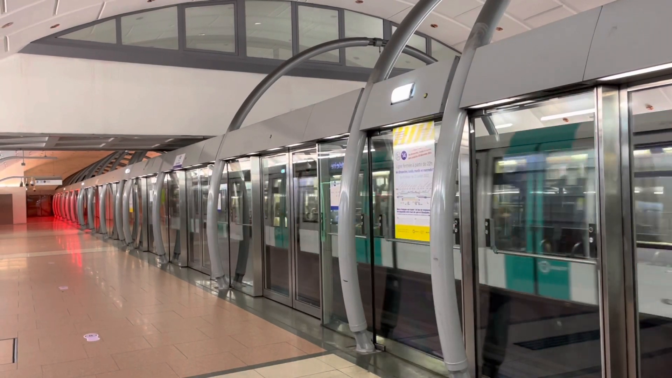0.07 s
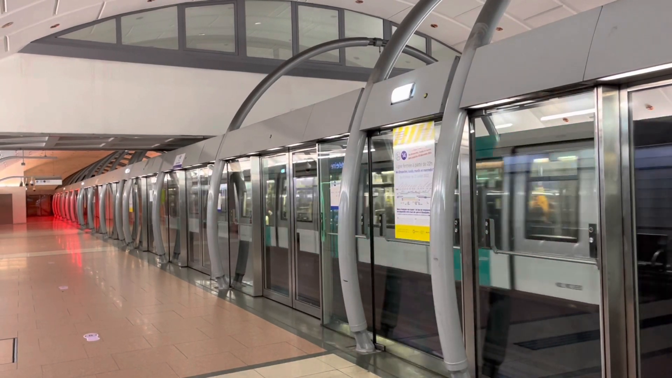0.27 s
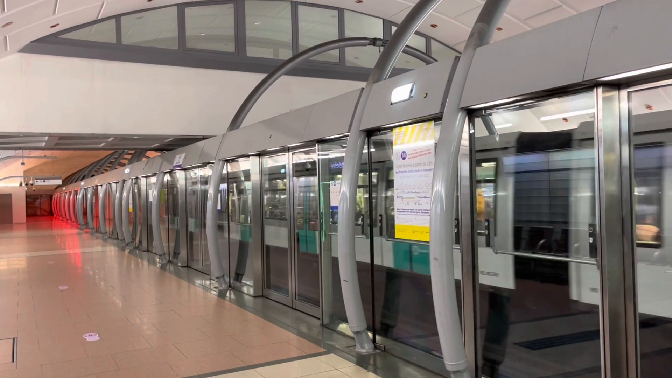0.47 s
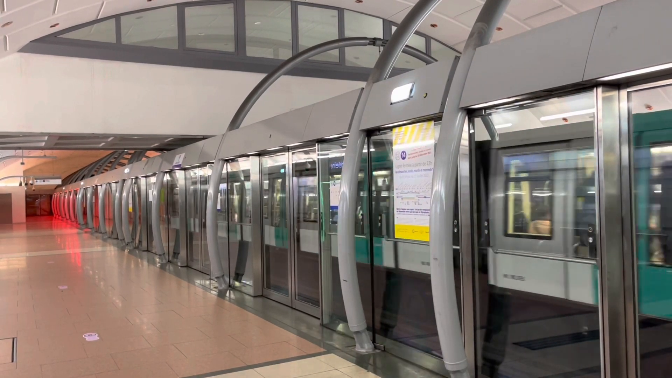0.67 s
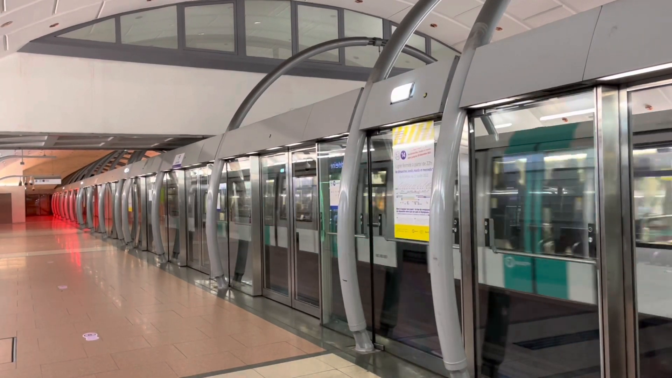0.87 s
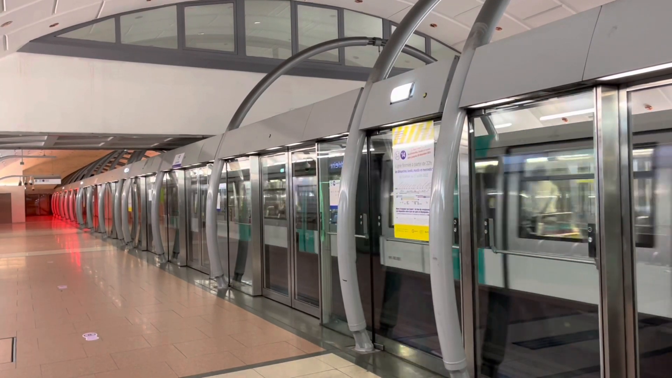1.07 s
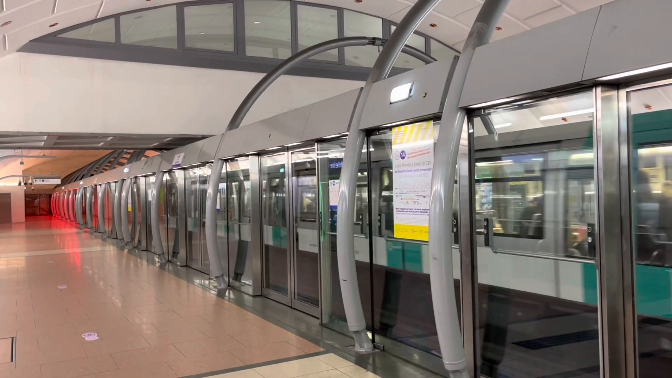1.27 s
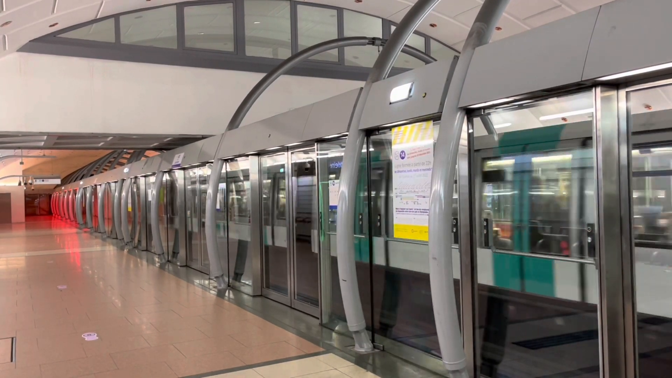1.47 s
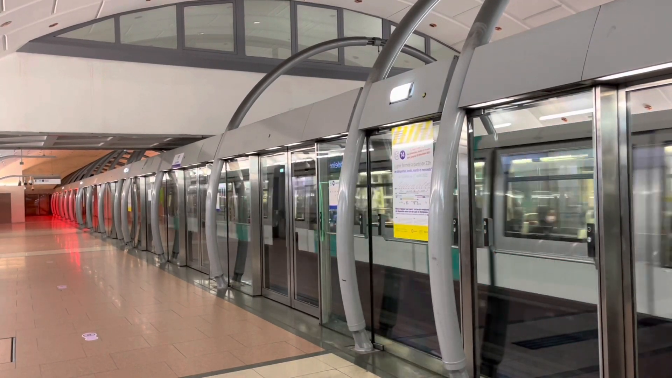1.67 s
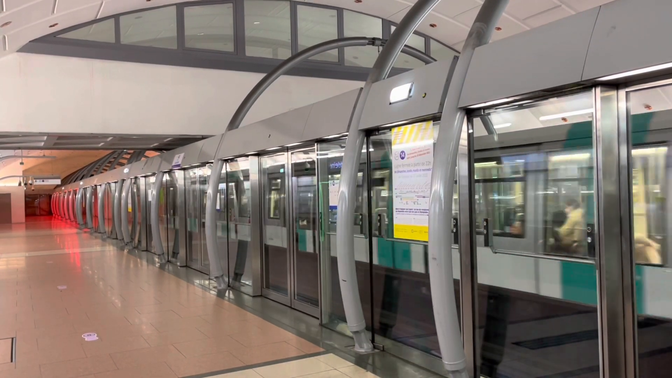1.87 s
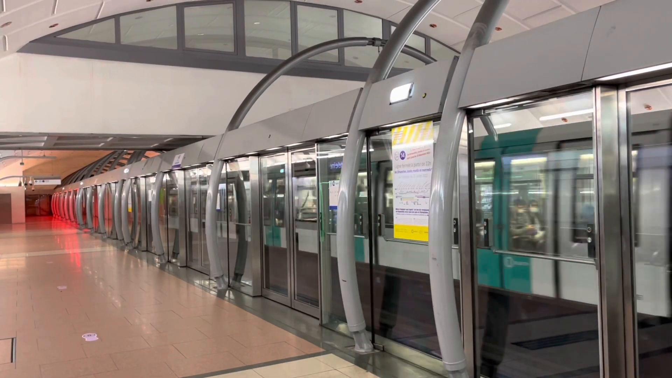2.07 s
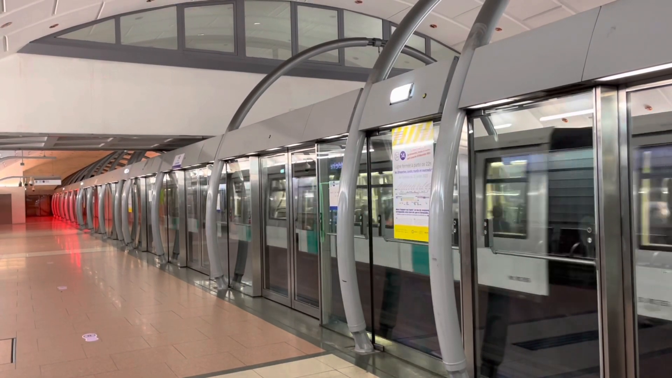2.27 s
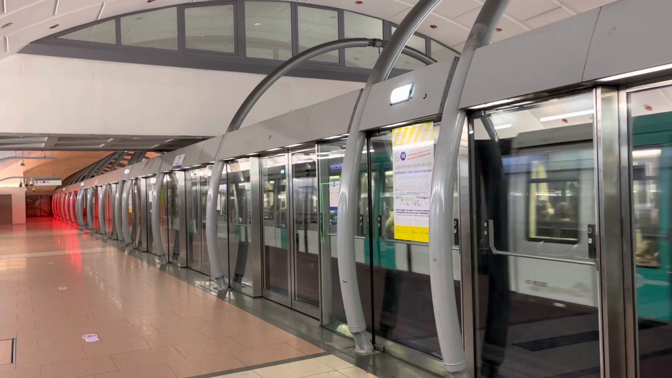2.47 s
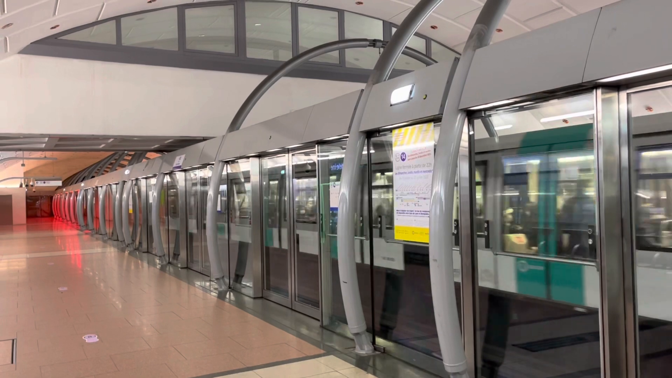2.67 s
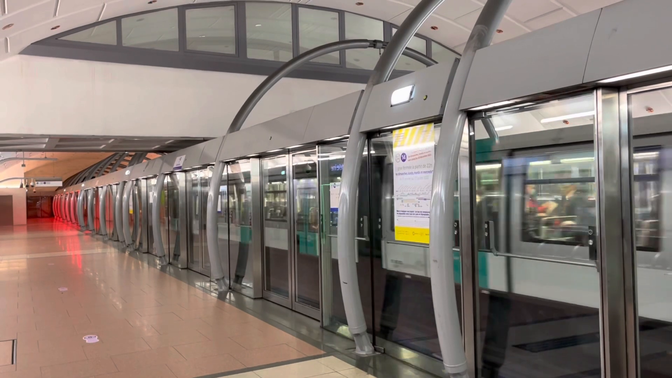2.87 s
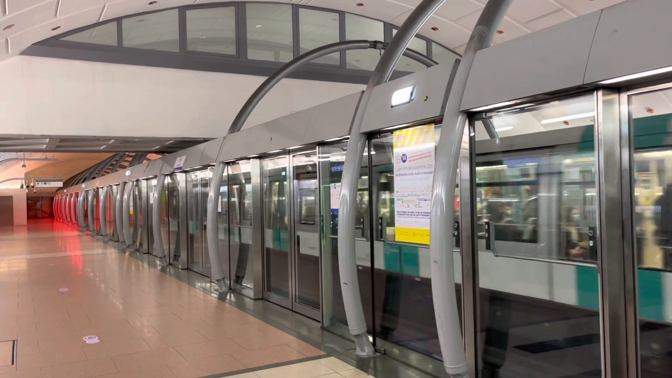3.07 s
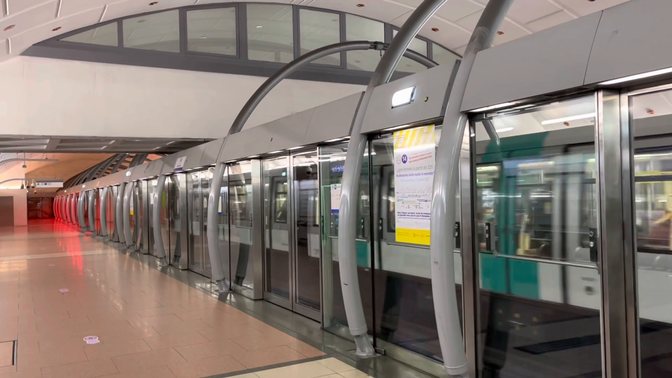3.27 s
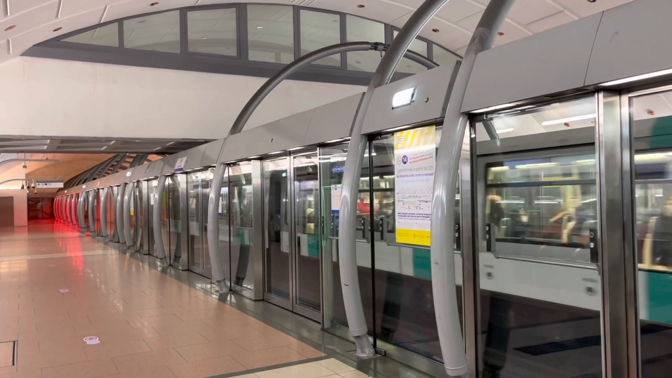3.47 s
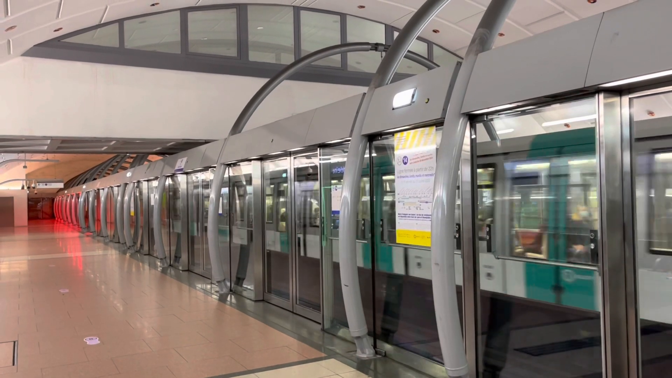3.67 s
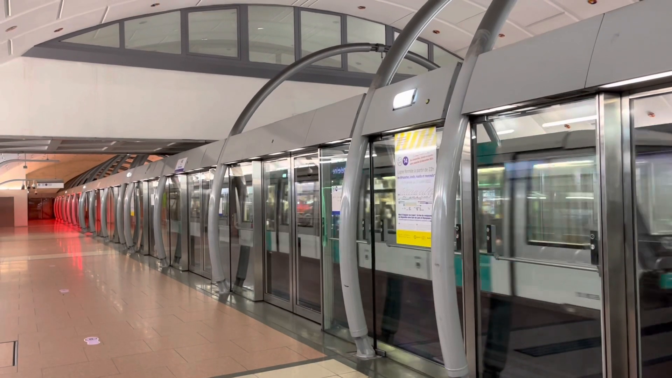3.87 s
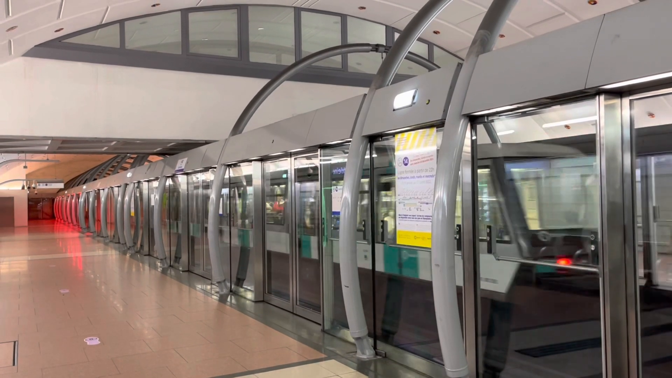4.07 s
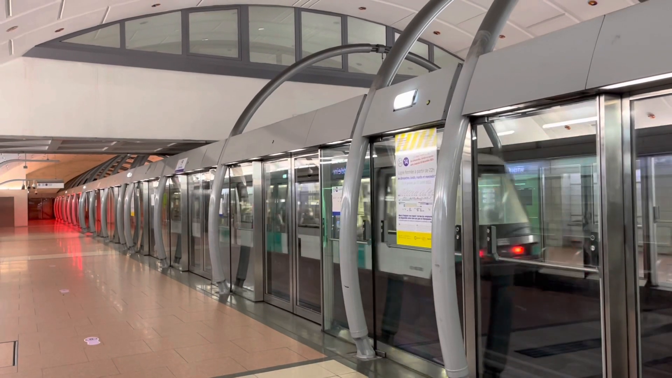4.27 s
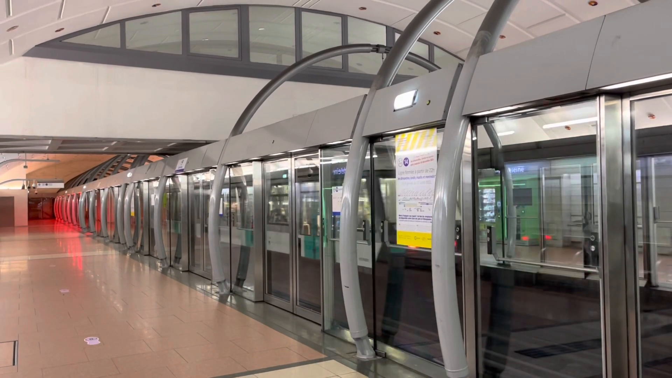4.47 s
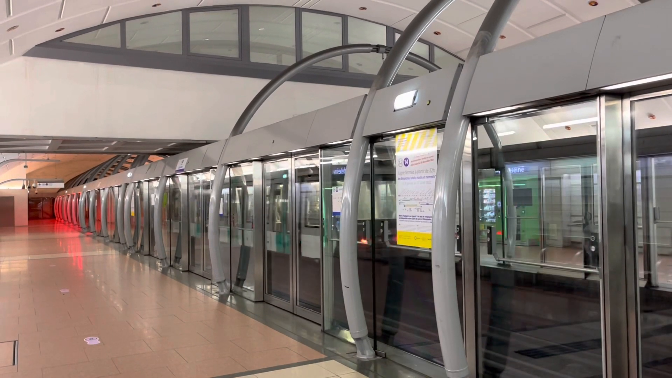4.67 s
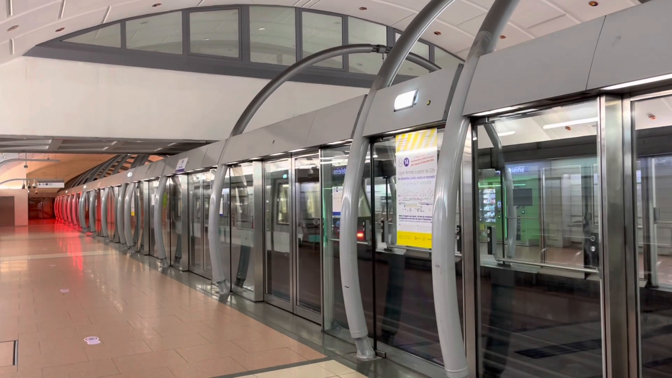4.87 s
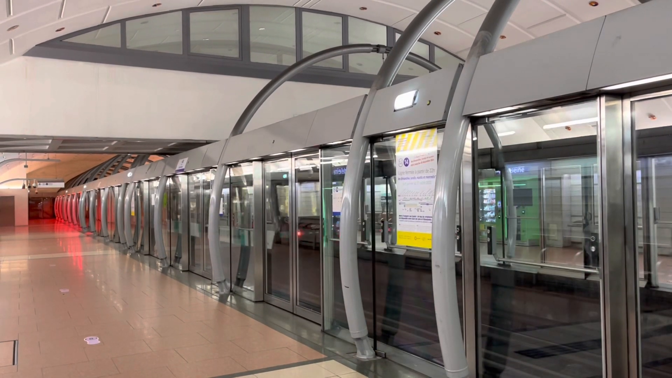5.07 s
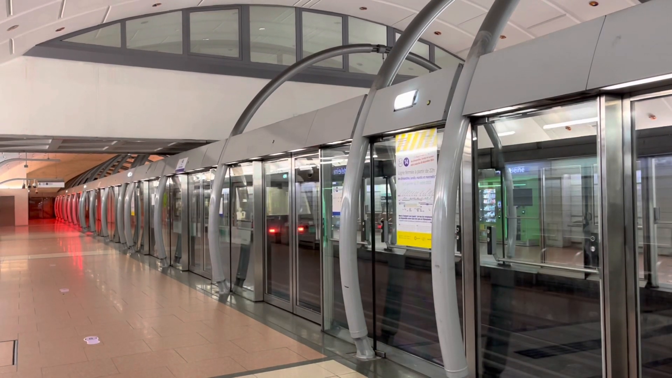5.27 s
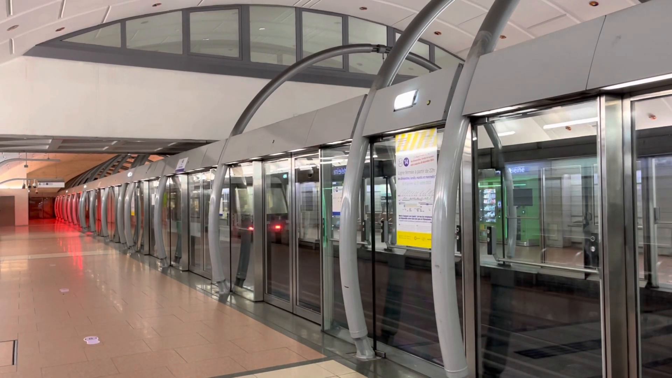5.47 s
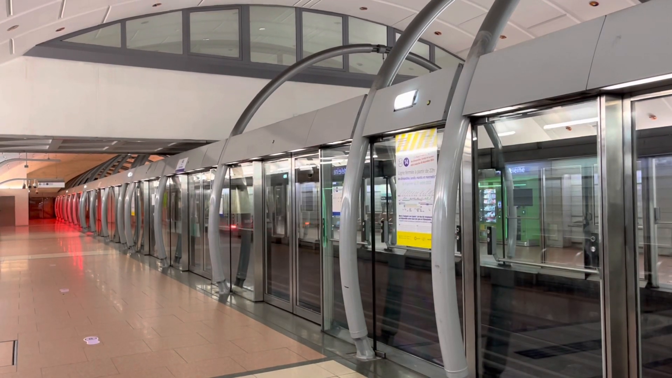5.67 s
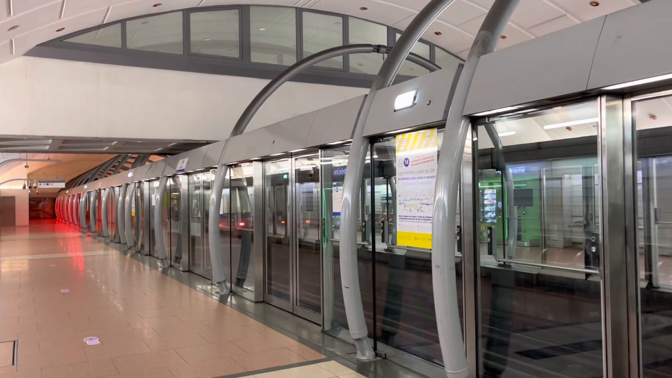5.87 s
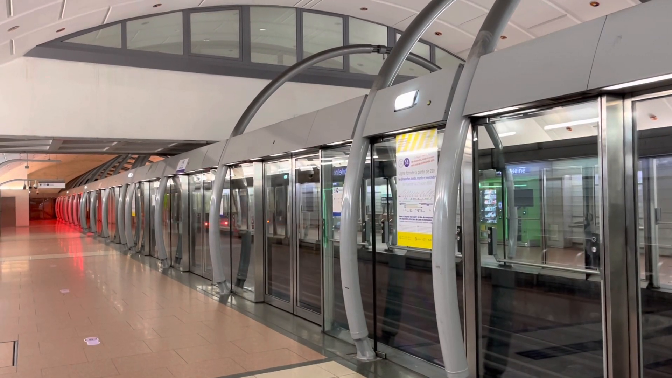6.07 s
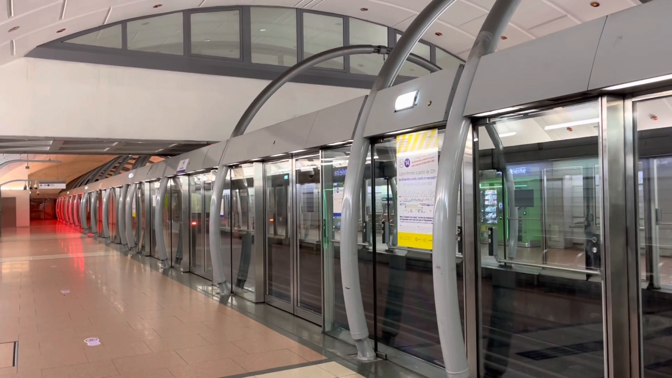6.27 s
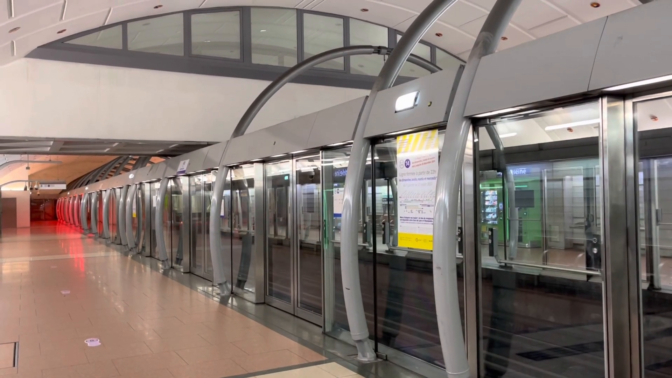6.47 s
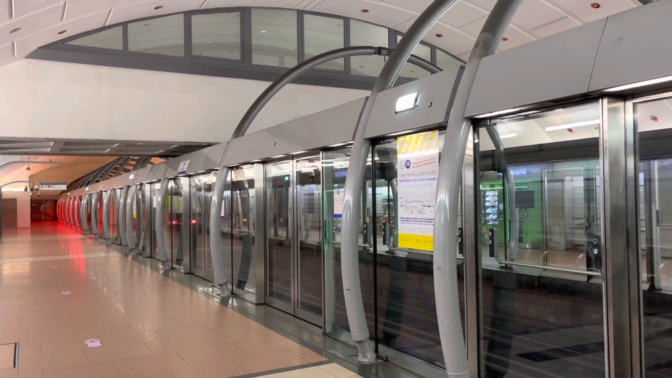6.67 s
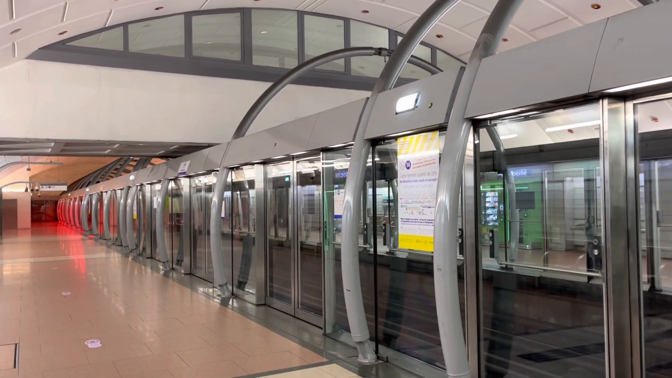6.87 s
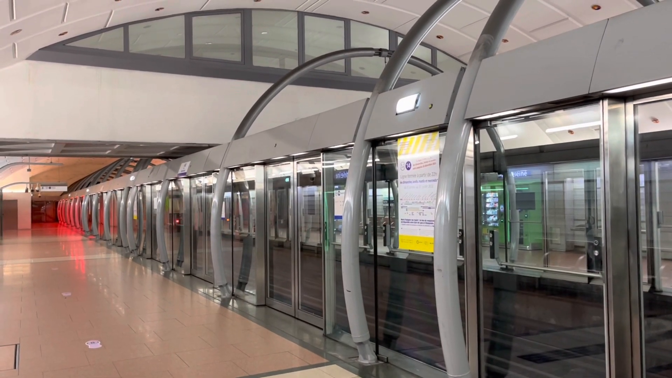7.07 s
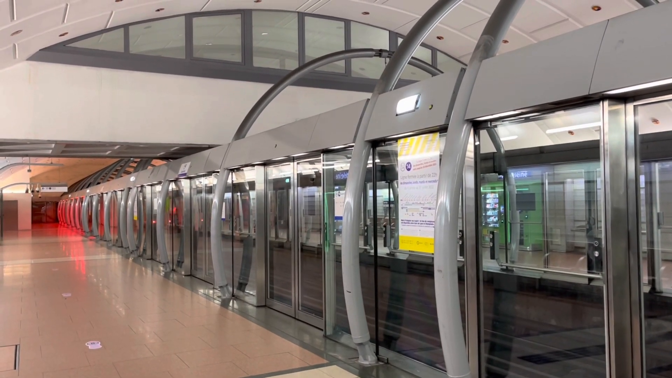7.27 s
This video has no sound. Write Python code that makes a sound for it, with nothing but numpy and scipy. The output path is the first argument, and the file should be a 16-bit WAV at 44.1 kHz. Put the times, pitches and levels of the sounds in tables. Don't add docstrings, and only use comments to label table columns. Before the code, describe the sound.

A rubber-tyred metro train is already moving from 0 s, heard from an underground platform through glass doors. A low, throbbing tyre hum, about 200 Hz, climbs smoothly to about 280 Hz by the end, with wavering overtones like a motor whine. It pulses irregularly as tyres beat in and out of step, strongest from about 2.3 to 4 s. Continuous deep rumble, boomy body noise, rubber roar and hiss fill the hall, with soft very low air surges and a thin high sizzle. Around 2.6 and 3.5-3.8 s, faint brief tones mark passing axles. The tail passes around 3-4 s; roar and hiss then gradually thin and the sizzle drops away, while the rising hum still throbs from the receding train, with a marked pulse near 5.4 s. Rumble and hum continue to about 7.3 s. Close two-port stereo: centred bass, wider mids and treble.

```python
import sys
import numpy as np
from scipy import signal
from scipy.fft import rfft, irfft, next_fast_len
from scipy.io import wavfile
from scipy.ndimage import uniform_filter1d

SR = 44100
rng = np.random.default_rng(int(sys.argv[2]) if len(sys.argv) > 2 else 0)


def ratio(d):
    e = np.asarray(d, float) / 20
    return 10 ** e


def log_audio(samples):
    frames = np.atleast_2d(samples).T
    limited = np.clip(frames, -1, 1)
    pcm = np.round(limited * 32767).astype(np.int16)
    wavfile.write(sys.argv[1], SR, pcm)


N = 322150
PADDED = next_fast_len(N)

# time [s], tread rate [Hz].
SPEED = [(0, 199.7), (1, 211.8), (2.3, 228.1), (3.7, 242.9), (5, 256.8), (6, 268.6), (7.3, 281.5)]
# time [s], peak level [dB], half length [ms].
HUM_SWELLS = [(.068, -23.5, 33), (.38, -20, 67), (.62, -23, 240), (1.03, -20.5, 47), (1.218, -20.5, 65),
              (1.46, -24.5, 82.6), (1.84, -20.5, 68), (2.28, -16, 60.6), (2.52, -22, 160), (2.8, -17.5, 88),
              (3.13, -17, 94), (3.3, -19, 65), (3.42, -15, 38.3), (3.7, -15, 44), (3.86, -17, 65),
              (3.98, -15.5, 31.3), (4.18, -19, 57), (4.37, -20.5, 88), (4.545, -20, 33.8),
              (4.94, -19.5, 15), (5.17, -20.5, 126), (5.434, -16, 23), (5.708, -21, 37), (5.88, -24.5, 92),
              (6.047, -21.5, 25), (6.3, -19, 19), (6.48, -18.5, 54), (6.87, -17.5, 82), (7.02, -19.5, 46),
              (7.25, -19, 98)]
# multiple of the tread rate, width [Hz], then level [dB] early,
# as the tail passes and once it has gone.
TREAD_TONES = [(1.0, 25, -39, -43, -29.5), (1.17, 13.6, -25, -34, -42), (1.36, 10.2, -36, -37.5, -41),
               (1.7, 5.7, -34, -41, -57.5), (2.0, 11.7, -35, -37.5, -46), (2.35, 18, -38.5, -40.5, -40.5),
               (3.0, 13.5, -40, -41, -45.5), (3.52, 31, -55, -46, -43), (4.0, 37, -37.5, -40, -47),
               (4.68, 23, -39.5, -43, -45), (5.85, 15, -39.5, -41, -44.5), (7.0, 30, -41, -55, -50),
               (8.2, 17, -47, -48.5, -49)]
STAGES_S = (1, 3.4, 6.1)
# time [s], peak level [dB], half length [ms].
AIR_SURGES = [(0, -36, 140), (.55, -40, 160), (1.12, -37, 150), (1.58, -37, 260), (2.2, -36, 160),
              (2.54, -40, 70), (2.97, -40, 130), (3.55, -36, 260), (4.08, -48, 50), (4.85, -43, 200),
              (5.22, -35, 190), (5.6, -34, 140), (6.0, -34.5, 220), (6.47, -36, 130), (6.73, -41, 50),
              (7.05, -41, 120)]
# level at the start [dB], change as fewer cars remain [dB per s],
# share of the tail's distance loss [0-1].
ROLLING_LEVELS = [
    (-28.5, -0.41, 0.16),
    (-28.5, -.5, 0.22),
    (-24, -1.11, 0.19),
    (-33, -1.13, 0.22),
    (-46.5, 0.27, 0.86),
]
# frequency [Hz], density [dB per Hz].
RUMBLE_COLOUR = [(20, -41), (34, -28), (46, -2.5), (62, -2), (105, 0.5), (165, -2), (200, -1.5), (260, 3),
                 (420, -26.5), (800, -75)]
BOOM_COLOUR = [(100, -62), (200, -21), (310, 1.5), (385, -1), (450, -5), (560, -6.5), (700, -8),
               (1000, -13.5), (2000, -79)]
ROAR_COLOUR = [(200, -74), (450, -11), (750, -2.5), (1100, -1), (1620, 0), (1760, -4), (2600, -3),
               (3400, -5.5), (4500, -22.5), (8000, -64)]
HISS_COLOUR = [(1500, -65), (2600, -47), (3700, -4), (5100, -8), (6000, -12), (7000, -16), (9000, -27.5),
               (14000, -72)]
SIZZLE_COLOUR = [(3000, -56), (5200, -18), (7000, -2), (7600, -5.5), (9000, -4), (11000, -10), (13200, -13),
                 (14500, -13), (15100, -23), (15600, -36)]
# time [s], pitch [Hz], level [dB], length [s].
AXLES = [(3.5, 1695, -41, .15), (3.68, 1130, -43, .05), (3.82, 1145, -40, .06), (2.65, 930, -43, .15)]
# frequency [Hz], likeness [0-1], right phase lead [rad], left over right
# [dB].
PORTS = [(40, .997, 0, 0), (90, .988, 0, 0), (140, .955, 0, 0), (210, .88, 0, -.4), (320, .75, -.1, 0),
         (500, .45, -.2, 1.5), (1000, .15, .1, .5), (1550, .3, 2.6, -2.5), (1760, .65, 5.9, 3.5),
         (2800, .52, 5.4, 2), (5000, .45, 5.5, 8.5), (5600, .25, 7.5, 6),
         (7000, .6, 8.0, 2), (7450, .75, 8.4, .5), (7800, .96, 9.1, 0), (8900, .97, 9.7, 0),
                (9900, .9, 10.9, 0), (11700, .96, 12.5, 0), (12700, .96, 13.0, 0), (13800, .88, 14.0, 0),
                (14800, .97, 15.6, 0)]


def rms_one(x):
    return x / np.sqrt(np.mean(np.abs(x) ** 2) + 1e-20)


def seconds():
    return np.arange(N) / SR


def in_time(rows):
    s, *columns = np.transpose(rows)
    return [np.interp(seconds(), s, column) for column in columns]


def on_bins(points):
    hz, *columns = np.transpose(points)
    log_hz = np.log(np.arange(PADDED // 2 + 1) * SR / PADDED + 1)
    return [np.interp(log_hz, np.log(hz), column) for column in columns]


def drift(rate_hz, channels=2):
    hop, settle = 40, 2000
    r = np.exp(-2 * np.pi * rate_hz * hop / SR)
    noise = rng.standard_normal((channels, N // hop + settle + 2))
    slow = rms_one(signal.lfilter([1], [1, -2 * r, r * r], noise)[:, settle:])
    return np.array([np.interp(np.arange(N) / hop, np.arange(len(s)), s) for s in slow])


def narrow(turns, width_hz):
    wander = drift(width_hz, channels=4)
    return wander[:2] * np.cos(2 * np.pi * turns) + wander[2:] * np.sin(2 * np.pi * turns)


def coloured(colour, level_db, patchy_db):
    spectrum = rfft(rng.standard_normal((2, PADDED))) * ratio(on_bins(colour)[0])
    noise = irfft(spectrum, PADDED)[:, :N]
    return rms_one(noise) * ratio(level_db + patchy_db * drift(8.0, channels=1))


def swells(rows, bed_db):
    s, db, half_ms = np.transpose(rows)
    coarse = np.arange(0, N / SR, .002)
    away_ms = 1000 * (coarse - s[:, None])
    bells = ratio(db)[:, None] * np.exp(-(away_ms / half_ms[:, None]) ** 2)
    power = np.interp(seconds(), coarse, np.sum(bells ** 2, axis=0))
    return np.sqrt(power + ratio(bed_db) ** 2)


def leaving(start_db, db_per_s, share):
    tail_passes_s = 3.0
    tail_recedes_s = 1.0
    t = seconds()
    distance = np.maximum(t - tail_passes_s, 0) / tail_recedes_s
    return start_db + db_per_s * t - share * 10 * np.log10(1 + distance ** 2)


def wheel_turns():
    return np.cumsum(in_time(SPEED)[0]) / SR


def load_tyres():
    s = np.transpose(HUM_SWELLS)[0]
    flutter, wobble = drift(16.0)
    beats = drift(14, channels=1)[0]
    bed_db = leaving(-25, -0.21, 0.44) + 3.0 * np.tanh(beats)
    flutter_db = 3.0 * np.minimum(flutter, 0.4)
    size = np.sqrt(2) * swells(HUM_SWELLS, bed_db) * ratio(flutter_db)

    sharp, wander_hz = 1.004, 1.5
    turns = sharp * wheel_turns() + np.cumsum(wander_hz * drift(3.94, channels=1)[0]) / SR
    slips = np.cumsum(rng.normal(0, 0.82, len(s)))
    leader = np.searchsorted((s[1:] + s[:-1]) / 2, seconds())
    slip = uniform_filter1d(slips[leader], size=SR // 50)

    near = size * np.sin(2 * np.pi * turns + slip + 0.42 * wobble)
    far_size = ratio(-5.5) * uniform_filter1d(size, size=SR // 2)
    far = far_size * narrow(wheel_turns(), width_hz=9.7)[0]
    return np.array([near, far])


def tread_tones():
    turns = wheel_turns()
    tones = np.zeros((2, N))
    for order, width_hz, *stages_db in TREAD_TONES:
        level_db = in_time(list(zip(STAGES_S, stages_db)))[0]
        tones += ratio(level_db) * narrow(order * turns, width_hz)
    return tones


def air_mode():
    mode_hz, width_hz, bed_db = 47.5, 2, -54
    turns = mode_hz * seconds() + 0.18 * drift(width_hz)
    return np.sqrt(2) * swells(AIR_SURGES, bed_db) * np.sin(2 * np.pi * turns)


def rolling():
    rumble_db, boom_db, roar_db, hiss_db = [leaving(*row) for row in ROLLING_LEVELS[:-1]]
    rumble = coloured(RUMBLE_COLOUR, rumble_db, patchy_db=.5)
    boom = coloured(BOOM_COLOUR, boom_db, patchy_db=.6)
    roar = coloured(ROAR_COLOUR, roar_db, patchy_db=.3)
    hiss = coloured(HISS_COLOUR, hiss_db, patchy_db=.25)
    return rumble + boom + roar + hiss


def current_shoes():
    return coloured(SIZZLE_COLOUR, leaving(*ROLLING_LEVELS[-1]), patchy_db=.5)


def last_axles():
    t = seconds()
    passes = np.zeros((2, N))
    for s, hz, db, length_s in AXLES:
        bell = ratio(db) * np.exp(-((t - s) / length_s) ** 2)
        passes += bell * (np.sin(2 * np.pi * hz * t) + 0.87 * narrow(hz * t, width_hz=13.0))
    return passes


def scene():
    return load_tyres() + tread_tones() + air_mode() + rolling() + current_shoes() + last_axles()


def roll_off(x):
    return signal.sosfilt(signal.butter(12, 15700, fs=SR, output="sos"), x)


def record(dry):
    alike, lead, tilt_db = on_bins(PORTS)
    alike = np.clip(alike, 0, 1)
    first, second = rfft(dry, PADDED)
    right = alike * np.exp(1j * lead) * first + np.sqrt(1 - alike ** 2) * second
    spectra = np.array([first * ratio(tilt_db / 2), right * ratio(-tilt_db / 2)])
    mix = irfft(spectra, PADDED)[:, :N]
    return roll_off(mix)


dry = scene()
out = record(dry)
log_audio(out)
```